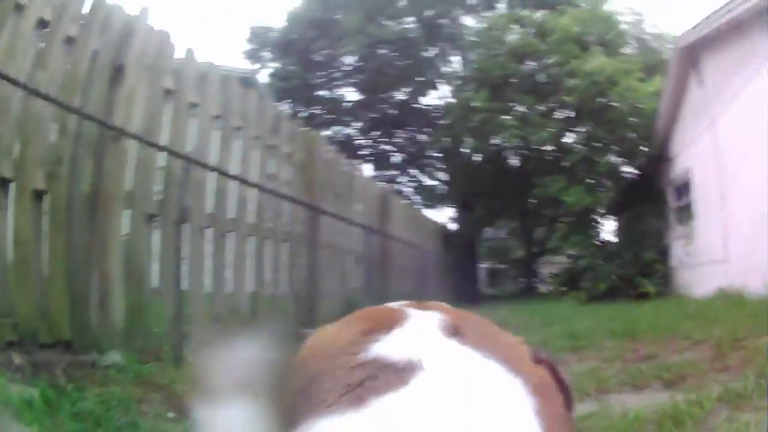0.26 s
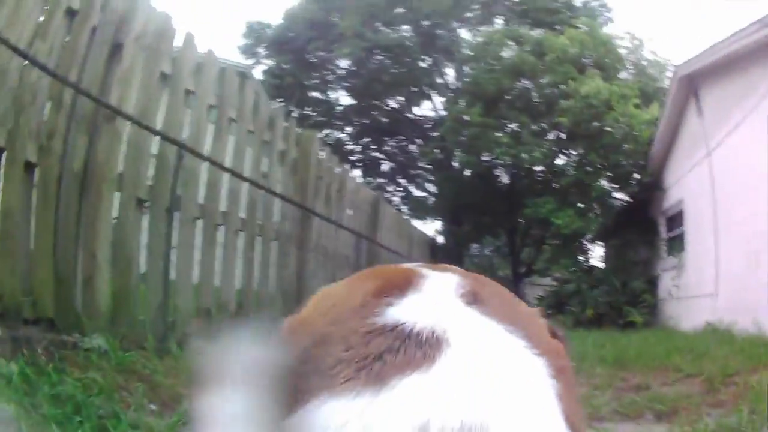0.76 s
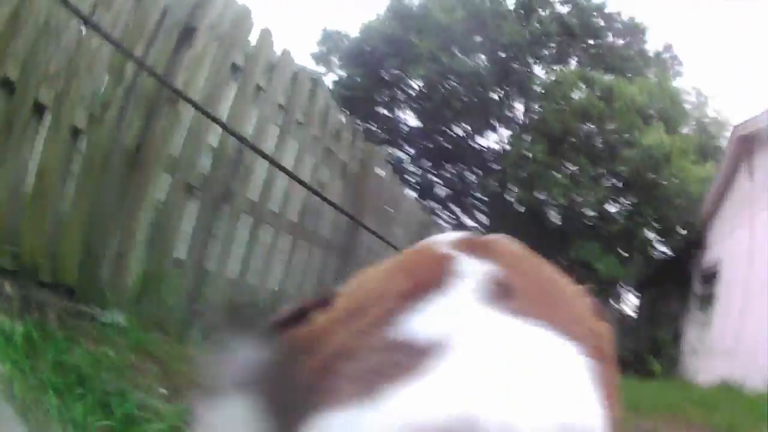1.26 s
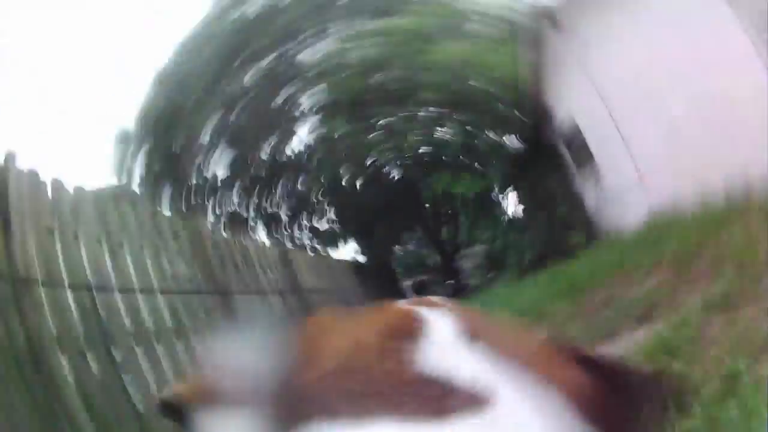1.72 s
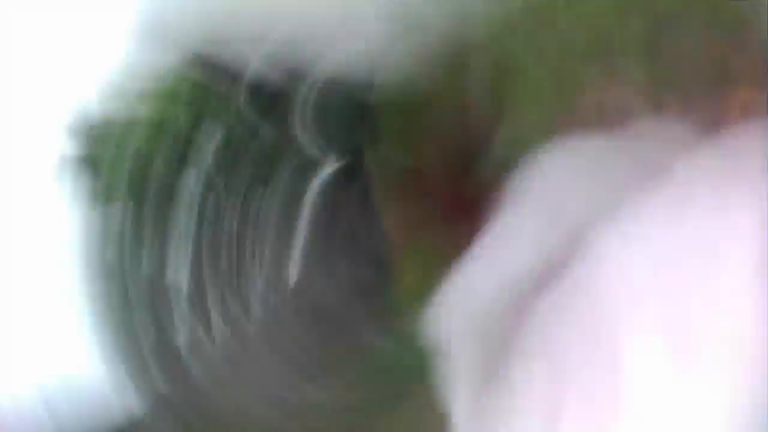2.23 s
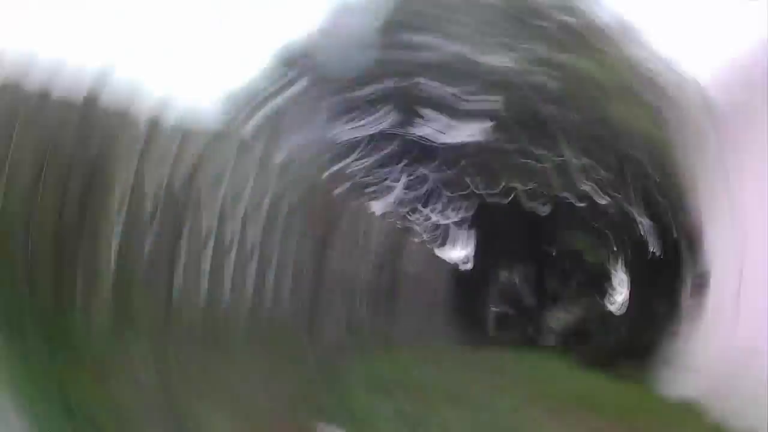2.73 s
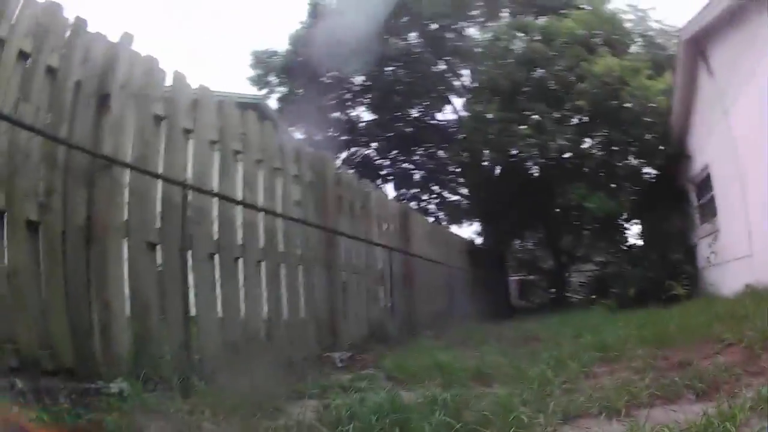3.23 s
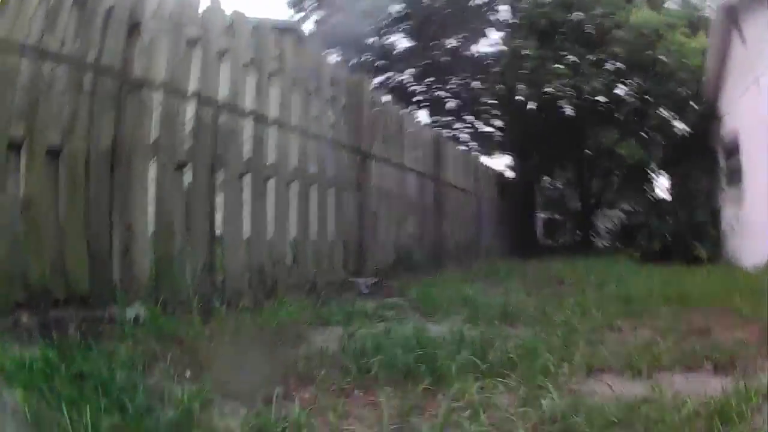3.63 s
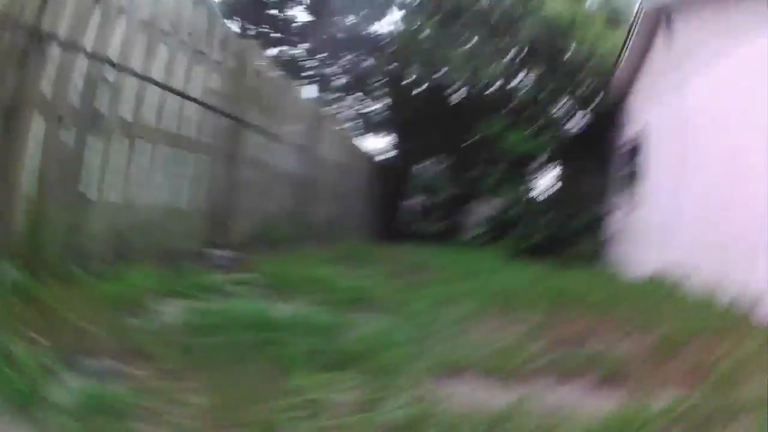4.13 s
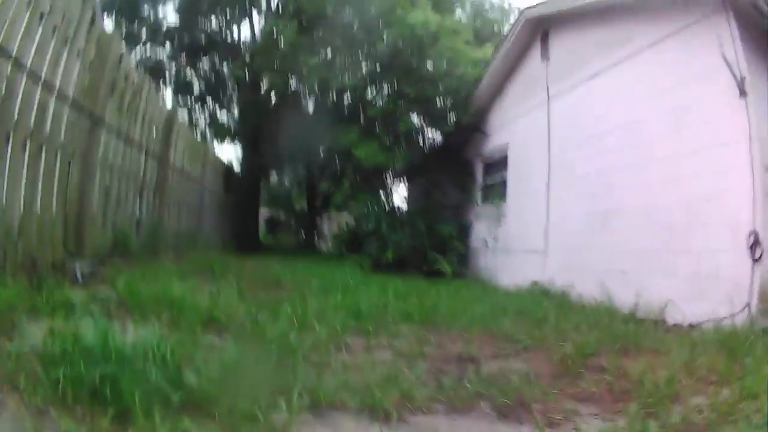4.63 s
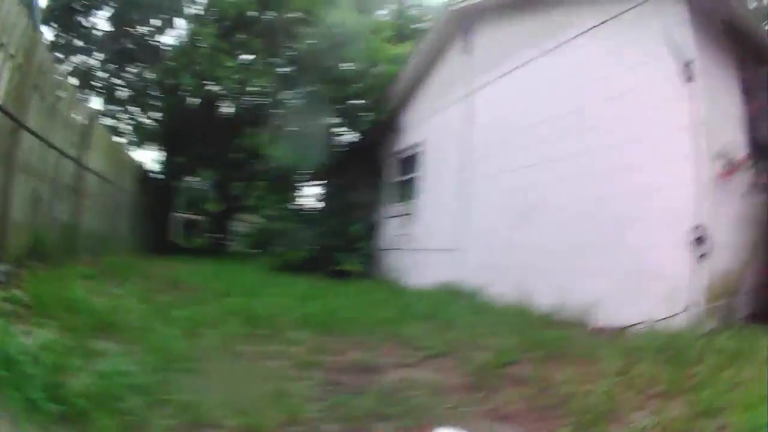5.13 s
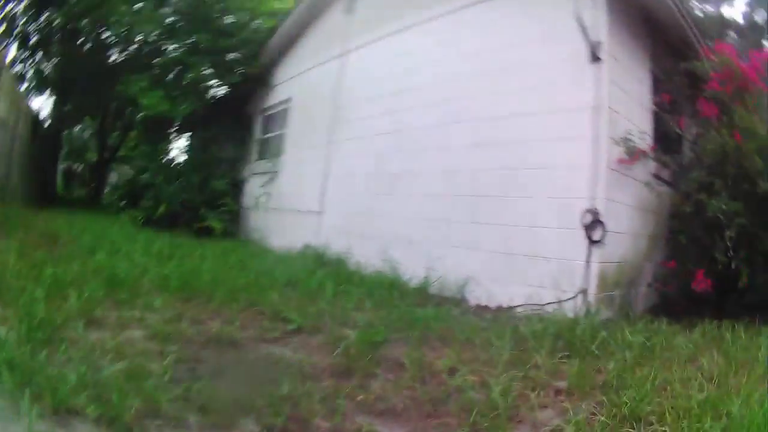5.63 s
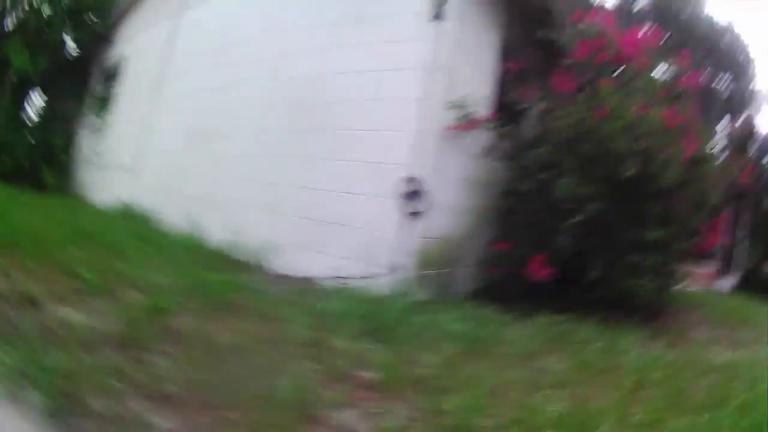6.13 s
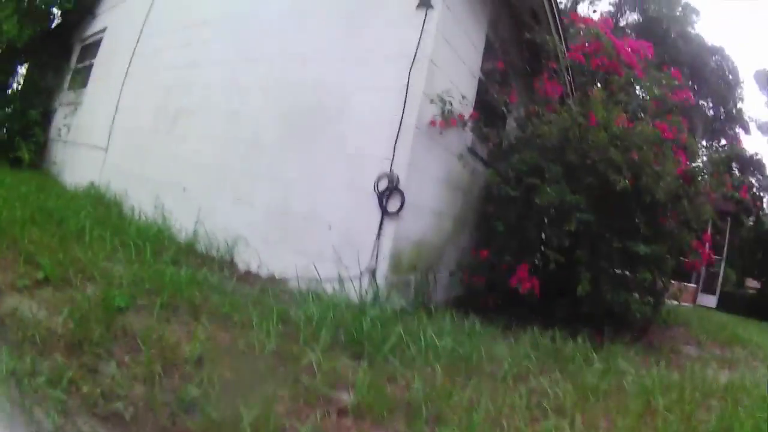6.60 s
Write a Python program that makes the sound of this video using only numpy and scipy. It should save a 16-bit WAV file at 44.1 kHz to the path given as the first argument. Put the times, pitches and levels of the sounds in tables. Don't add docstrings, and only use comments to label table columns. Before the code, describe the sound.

Heard from a small, cheap camera on a dog's harness: dull, band-limited sound with soft rain behind. Dry metallic ticks and very high, thin tag rings come first, then a hard machine-gun rattle of gear against the housing, overloading the input for under a second. Afterwards the rain remains, with single buckle ticks, a barely audible insect trill and distant short bird chirps.

```python
import sys
import numpy as np
from scipy import signal
from scipy.fft import rfft, irfft, next_fast_len
from scipy.io import wavfile
from scipy.ndimage import uniform_filter1d, map_coordinates

SR = 44100
rng = np.random.default_rng(int(sys.argv[2]) if len(sys.argv) > 2 else 0)


def store_wav(level_fs):
    pcm = np.round(np.clip(np.atleast_2d(level_fs), -1, 1) * 32767)
    wavfile.write(sys.argv[1], SR, pcm.T.astype(np.int16))


def undo_db(level):
    steps = np.asarray(level, float) / 20
    return 10 ** steps


N = 302568

# [f/Hz, level/dB]
RAIN_TONE = [(12, -45), (25, -8.5), (115, -5.5), (350, -3), (1050, -7.5), (1900, -7), (2300, -23),
             (3300, -24.5), (4400, -28), (5600, -29), (7000, -31.5), (8500, -36.5), (10000, -38.5),
             (14000, -70)]
# [t/s, level/dB]
RAIN_LEVEL = [(0, -51), (1.5, -50.5), (3.2, -51), (4.5, -51), (5.7, -50), (6.86, -50.5)]
# [f/Hz, width/Hz, level/dB]
MACHINE_HUM = [(115.6, 16, -64.5), (168.2, 16, -66), (215.2, 7.4, -65), (356.7, 9.9, -65), (601.1, 27, -66)]
# [t/s, level/dB]
WHINE_LEVEL = [(5.62, -94.5), (5.7, -66.5), (6.27, -61.5), (6.35, -97.5)]
# [t/s, level/dB]
TRILL_LEVEL = [(0, -82), (.8, -85.5), (1.6, -84.5), (3.1, -83.5), (3.4, -78.5), (4.2, -85.5), (5.2, -82.5),
               (6, -85), (6.86, -80.5)]
TRILL_RATE_HZ, TRILL_START_S = 31.24, 3.197

# [t/s, peak level/dB, low ring level/dB, high ring level/dB]
BUCKLE_TICKS = [(0.3603, -40.5, -5, -9.5), (0.709, -33, -8, -8.5), (0.7509, -38, -27, 1),
                (1.281, -47.5, -13, -4.5), (1.6564, -37.5, 2, -12.5), (1.716, -44.5, -17, 4),
                (1.7686, -34, -2.5, -6), (2.2112, -34, -6.5, -17), (2.2184, -40, -2.5, -22.5),
                (2.7597, -22, -11.5, -6), (2.957, -24, -3, 0), (3.0857, -45, -1.5, -6),
                (3.9583, -59.5, -17.5, -16), (4.1367, -43, 0.5, -23.5), (4.8349, -33.5, -9.5, -10),
                (5.414, -48.5, -9, -26), (6.014, -34, -1, 1), (6.2981, -38.5, -9, -2.5)]
# [t/s, peak level/dB, low ring level/dB, high ring level/dB]
RING_TICKS = [
    (3.288, -42.5, -20, -1.5),
    (3.4883, -36, -31.5, -11.5),
    (3.911, -53, -8.5, 5.5),
    (3.9777, -35, -7, -8),
    (5.468, -42, -4.5, 3),
]
# [t/s, peak level/dB, low ring level/dB, high ring level/dB]
SNAP_TICKS = [
    (1.3023, -54.5, -7.5, 4),
    (1.4328, -49, -12.5, -1.5),
    (1.628, -40.5, -12, 5),
    (1.640, -49.5, -15, 8.5),
    (1.8134, -54.5, -5, 1.5),
    (1.9, -44.5, -10, 6.5),
    (3.347, -57, -21, 5),
    (3.925, -58, -24, 8),
    (5.1852, -46.5, -1, -5.5),
    (5.7447, -49, -1, -4.5),
]
# [first ring f/Hz, second ring f/Hz]
GEAR_PITCHES = [
    (3340, 5733),
    (3783, 6013),
    (3415, 7396),
]
CRACK = 5

# [t/s, level/dB, time to fade by 60 dB/s]
TAG_TOUCHES = [(.708, -79, 0.023), (1.30, -80.5, .15), (1.425, -73, 0.061), (1.629, -62, 0.095),
               (1.96, -66.5, 0.086), (1.99, -55, 0.1), (2.03, -69, 0.053), (2.08, -61.5, .06),
               (2.12, -66.5, .08), (2.684, -53.5, 0.068), (2.804, -55.5, 0.075), (2.957, -58.5, 0.0274),
               (3.001, -88.5, 0.21), (3.09, -69.5, 0.25), (3.33, -85, .1), (3.346, -54, 0.114),
               (4.834, -82, 0.021), (5.468, -77.5, 0.017)]
# [f/Hz, level/dB]
TAG_PITCHES = [(11800, -3), (12050, -2), (12450, -11.5), (12800, -5.5)]
SIDE_LOSS_DB = 0.02

# [t/s, level/dB]
SCUFF_LEVEL = [(1.55, -107.5), (1.64, -58.5), (2.05, -52), (2.2, -36.5), (2.6, -37), (2.855, -41.5),
               (2.868, -55.5), (3.0, -58), (3.5, -89.5)]
# [f/Hz, level/dB]
STRAP_TONE = [(500, -37), (1500, -10), (2700, -7), (5000, -3.5), (8000, -1), (10500, -18.5)]
# [f/Hz, width/Hz, level/dB]
HOUSING_RINGS = [(296.5, 622, -15), (1526, 1425, -10.5), (2123.6, 130.1, 2), (3231, 166.4, -6),
                 (4458, 540, -16.5), (5678, 220, -16.5), (7465, 1790, -25.5)]
# [f/Hz, level/dB]
THUMP_TONE = [(20, -27), (60, -2.5), (130, -4.5), (330, -5), (900, -14), (2000, -37.5), (4000, -40.5)]
# [t/s, length/s, chatter level/dB, wind-up/s, rebound level/dB]
SHAKE_STROKES = [
    (2.157, 0.04486, -20.5, .012, -44.5),
    (2.268, 0.0374, -19.5, 0.0287, -22.5),
    (2.371, 0.039, -18.5, 0.02, -27.5),
    (2.475, .042, -20, 0.0163, -37.5),
    (2.563, 0.0522, -21.5, .008, -36.5),
    (2.689, 0.03547, -19.5, .026, -35),
    (2.806, 0.02193, -24, 0.0096, -44.5),
]
WIND_UP_DB, WIND_UP_THUMP_DB, STROKE_THUMP_DB = -5.5, -24.5, -13
SWELL_S = 0.0013
REBOUND_GAP_S, REBOUND_S, REBOUND_THUMP_DB = .018, 0.0055, 1.5
# [t/s, length/s, chatter level/dB, thump level/dB]
LOOSE_KNOCKS = [(1.889, 0.0165, -43, -49.5), (1.941, .022, -41.5, -74.5), (2.01, .002, -33, -29.5),
                (2.017, 0.0064, -28.5, -32), (2.031, 0.0034, -30, -33.5), (2.059, 0.0015, -31, -47.5),
                (2.066, 0.0026, -31.5, -51), (2.074, 0.00526, -26.5, -33), (2.136, 0.008, -34.5, -41.5),
                (2.142, .003, -27, -33.5), (2.23, 0.0085, -37.5, -35.5), (2.247, .006, -41.5, -38.5),
                (2.362, 0.0025, -26.5, -29.5), (2.452, .010, -30.5, -59), (2.538, 0.0151, -25.5, -24.5),
                (2.787, .005, -33.5, -47.5), (2.845, 0.00333, -28, -43.5), (2.955, 0.0027, -40.5, -34.5),
                (2.963, 0.00846, -33.5, -47.5), (2.981, 0.0208, -51.5, -64.5)]

# [t/s, length/s, start f/Hz, end f/Hz, level/dB]
BIRD_NOTES = [
    (4.92, 0.039, 3900, 3830, -72),
    (4.977, 0.047, 3280, 3340, -74),
    (5.251, 0.058, 3960, 4027, -74.5),
    (5.258, 0.0714, 3150, 3340, -70.5),
    (5.31, 0.053, 4380, 4330, -72.5),
    (5.604, 0.04, 4050, 4100, -78),
    (5.634, 0.052, 4410, 4220, -69.5),
]
# [low f/Hz, high f/Hz, threshold level/dB]
MUTED_BANDS = [(2025, 2277, -51.5), (2260, 2600, -44.5), (2452, 2960, -44.5), (2884, 3190.2, -50.5),
               (4561.5, 5527, -47)]
TOP_HZ = 9350


def unit(x):
    return x / np.sqrt(np.mean(x ** 2) + 1e-20)


def level_curve(rows):
    t, level_db = np.transpose(rows)
    return np.interp(np.arange(N) / SR, t, level_db)


def wobble(rate):
    return map_coordinates(rng.standard_normal(int(N * rate / SR) + 4), [np.arange(N) * rate / SR])


def filtered(x, response):
    m = next_fast_len(N + 8192)
    return irfft(rfft(x, m) * response(np.fft.rfftfreq(m, 1 / SR)), m)[..., :N]


def coloured(x, points):
    f, v = np.transpose(points)
    return unit(filtered(x, lambda hz: undo_db(np.interp(np.log(hz + 1), np.log(f + 1), v))))


def resonant(x, modes):
    def response(f):
        total = 0
        for k, (centre, width, db) in enumerate(modes):
            spread = 1j * f * width
            total = total + (-1) ** k * undo_db(db) * spread / (centre ** 2 - f ** 2 + spread)
        return total
    return filtered(x, response)


def knocks(rate, scatter_db):
    chance, side, size = rng.random((3, N))
    return (chance < rate / SR) * np.sign(side - .5) * undo_db(-scatter_db * np.log(size + 0.0022))


def rain():
    drops = rng.standard_normal(N) + 0.255 * unit(knocks(980, scatter_db=6))
    z = signal.stft(drops, nperseg=512)[2]
    patches = uniform_filter1d(rng.standard_normal(z.shape), size=6, axis=0)
    patches = uniform_filter1d(patches, size=12, axis=1)
    hiss = signal.istft(z * undo_db(1.117 * unit(patches)), nperseg=512)[1][:N]
    return coloured(hiss, RAIN_TONE) * undo_db(level_curve(RAIN_LEVEL) - 1.5 + 0.33 * wobble(3.905))


def far_machines():
    hum = np.zeros(N)
    for hz, width_hz, db in MACHINE_HUM:
        hum += undo_db(db) * unit(resonant(rng.standard_normal(N), [(hz, width_hz, 0)]))
    whine = unit(resonant(rng.standard_normal(N), [(988, 7.3, 0)]))
    return hum + undo_db(level_curve(WHINE_LEVEL)) * whine


def insect():
    t = np.arange(N) / SR
    cycle = ((t - TRILL_START_S) * TRILL_RATE_HZ + 0.054 * wobble(26)) % 1
    pitch_hz = 6700 + 900 * cycle + 170 * wobble(600)
    pulse = np.sin(np.pi * np.clip(cycle / 0.555, 0, 1)) ** 2
    flutter_db = 2.6 * wobble(13)
    tone = np.sin(2 * np.pi * np.cumsum(pitch_hz) / SR)
    return undo_db(level_curve(TRILL_LEVEL) + 16.0 + flutter_db) * pulse * tone


def ticks():
    out, t = np.zeros(N), np.arange(SR // 20) / SR
    for touches, (first_hz, second_hz) in zip((BUCKLE_TICKS, RING_TICKS, SNAP_TICKS), GEAR_PITCHES):
        for s, db, low_db, high_db in touches:
            modes = [(2110, 260, low_db), (first_hz, 700, -4), (3900, 1500, -4),
                     (second_hz, 650, high_db), (7100, 2800, high_db - 3.0)]
            burst = rng.standard_normal(len(t)) * undo_db(-60 * t / .008) * (1 - np.exp(-t / .0003))
            burst[0] = CRACK
            for hz, width_hz, mode_db in modes:
                edges = [hz - width_hz / 2, hz + width_hz / 2]
                band = signal.butter(N=2, Wn=edges, btype="band", fs=SR, output="sos")
                ring = signal.sosfilt(band, burst)
                out[round(s * SR):][:len(t)] += undo_db(db + mode_db) * ring / np.abs(ring).max()
    return out


def tags():
    out, t = np.zeros(N + SR), np.arange(SR // 4) / SR
    main_hz = TAG_PITCHES[1][0]
    for s, db, t60 in TAG_TOUCHES:
        drift = np.cumsum(rng.standard_normal((len(TAG_PITCHES), len(t))), axis=1) * .035
        ring = np.zeros(len(t))
        for (hz, level_db), phase in zip(TAG_PITCHES, drift):
            fade_db = level_db + rng.normal(0, 2) - SIDE_LOSS_DB * abs(hz - main_hz) * t
            ring += undo_db(fade_db) * np.sin(2 * np.pi * hz * t + phase)
        out[round(s * SR):][:len(t)] += undo_db(db - 60 * t / t60) * (1 - np.exp(-t / 0.0012)) * ring
    fluttering = out[:N] * undo_db(4 * wobble(170))
    return filtered(fluttering, lambda hz: np.exp(-((hz - 12300) / 650) ** 2) * (hz > 11100))


def blows():
    rows = [row + (0,) for row in LOOSE_KNOCKS]
    for s, length, db, wind_up, rebound_db in SHAKE_STROKES:
        rows.append((s - wind_up, wind_up, db + WIND_UP_DB, db + WIND_UP_THUMP_DB, wind_up))
        rows.append((s, length, db, db + STROKE_THUMP_DB, SWELL_S))
        back_s = s + length + REBOUND_GAP_S
        rows.append((back_s, REBOUND_S, rebound_db, rebound_db + REBOUND_THUMP_DB, 0))
    return rows


def swings(column, rise, fall):
    t, out = np.arange(N) / SR, np.zeros(N)
    for row in blows():
        start, length, swell = row[0], row[1], row[4]
        part = slice(int((start - .01) * SR), int((start + length + .05) * SR))
        u = t[part] - start
        attack = np.clip(u / (rise + swell), 0, 1)
        release = np.exp(-np.maximum(u - length, 0) / (fall + 0.0838 * length))
        out[part] += undo_db(row[column]) * attack * release
    return out


def rattled(rate, scatter_db, blotch_db):
    drive, ring = knocks(rate, scatter_db), np.zeros(N)
    for k, mode in enumerate(HOUSING_RINGS):
        ring += resonant(drive * undo_db(blotch_db * wobble(120)), [mode]) * (-1) ** k
    return unit(ring / np.abs(uniform_filter1d(ring ** 2, size=350)) ** .35)


def shake():
    scuff_db = level_curve(SCUFF_LEVEL)
    chatter = rattled(5000, scatter_db=2.5, blotch_db=4) * swings(column=2, rise=.001, fall=.0028)
    chatter *= undo_db(2.2 * wobble(200))
    scuff = rattled(1500, scatter_db=3.5, blotch_db=4.0) * undo_db(scuff_db + 2.84 * wobble(90))
    rub = coloured(knocks(3000, scatter_db=0.5), STRAP_TONE)
    rub *= undo_db(scuff_db - 16.5 + 6.45 * wobble(39.766))
    thump = coloured(knocks(260, scatter_db=5.0), THUMP_TONE)
    thump *= swings(column=3, rise=0.0047, fall=0.00225) + undo_db(scuff_db - 8.5)
    return chatter + scuff + rub + thump


def bird():
    out = np.zeros(N)
    for s, length, from_hz, to_hz, db in BIRD_NOTES:
        u = np.linspace(0, 1, round(length * SR))
        pitch_hz = from_hz + (to_hz - from_hz) * u
        waver = np.cumsum(rng.normal(0, .05, len(u)))
        whistle = np.sin(2 * np.pi * np.cumsum(pitch_hz) / SR + waver)
        out[round(s * SR):][:len(u)] += undo_db(db + 5) * np.sqrt(np.sin(np.pi * u)) * whistle
    return out


def scene():
    near = rain() + far_machines() + insect() + ticks() + shake() + bird()
    near = filtered(near, lambda hz: hz < 10900)
    return (near + tags())[None]


def overload(x):
    x = x / (1 + np.abs(x / .135) ** 3) ** (1 / 3)
    return filtered(x, lambda hz: 1 / (1 - (hz / 5600) ** 2 + 1.1j * hz / 5600) * (hz < 10400))


def mute_weak_bands(x):
    hz, _, z = signal.stft(x[0], SR, nperseg=1024)
    for low_hz, high_hz, threshold_db in MUTED_BANDS:
        band = (hz > low_hz) & (hz < high_hz)
        level_db = 10 * np.log10(np.sum(np.abs(z[band]) ** 2, axis=0) + 1e-12)
        level_db = np.maximum(level_db, np.roll(level_db, 1) + 4)
        z[band] *= undo_db(np.clip(4 * (level_db - threshold_db), -32, 0))
    busy = np.abs(z).sum(axis=0) > .12
    flicker_hz = 330 * np.repeat(rng.standard_normal(z.shape[1]), 2)[:z.shape[1]]
    top_hz = np.where(busy, 9800 + 0.5 * flicker_hz, TOP_HZ + flicker_hz)
    z *= np.where(hz[:, None] < top_hz, 1, undo_db(-34.5))
    return signal.istft(z, SR, nperseg=1024)[1][None, :N]


def roll_off(x):
    return signal.sosfilt(signal.butter(12, 14180, fs=SR, output="sos"), x)


def record(dry):
    high = filtered(dry, lambda hz: hz > 11000)
    low = mute_weak_bands(overload(dry - high))
    return roll_off(low + high)


dry = scene()
out = record(dry)
store_wav(out)
```